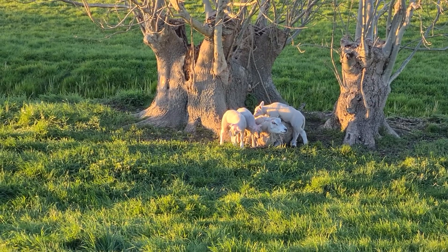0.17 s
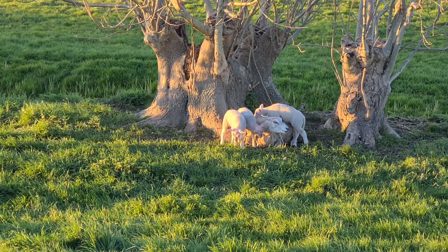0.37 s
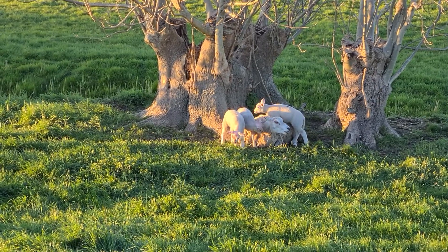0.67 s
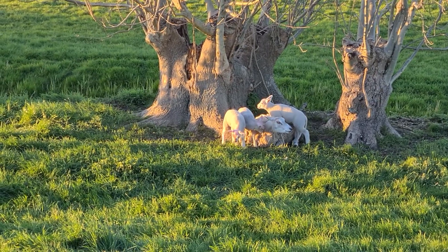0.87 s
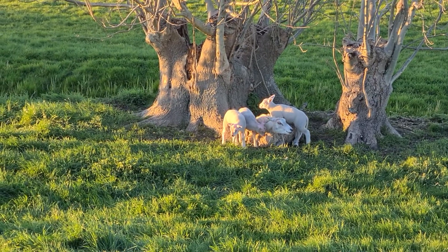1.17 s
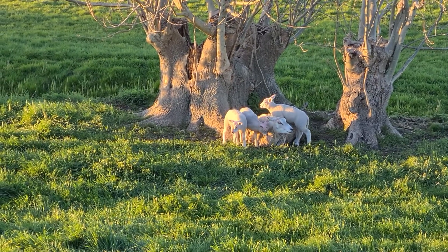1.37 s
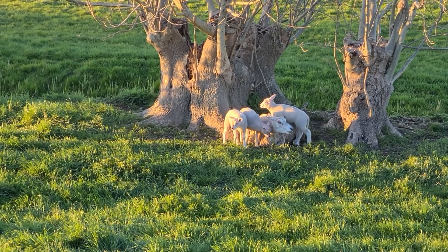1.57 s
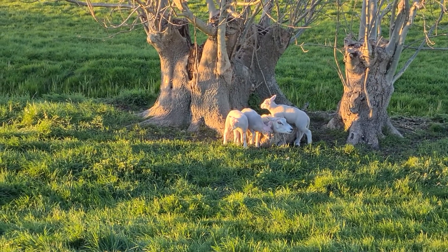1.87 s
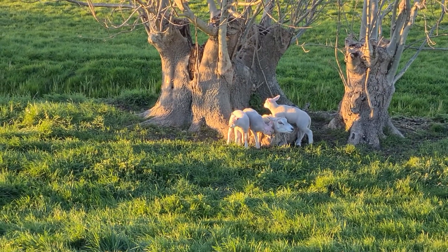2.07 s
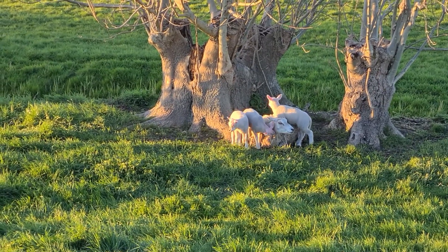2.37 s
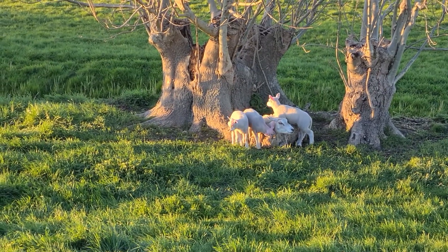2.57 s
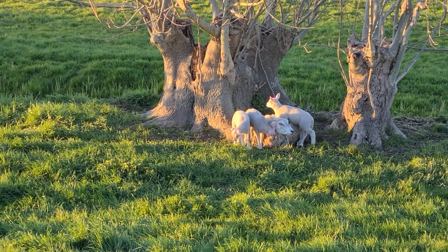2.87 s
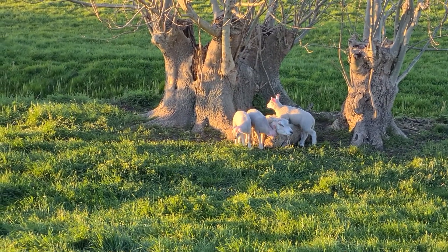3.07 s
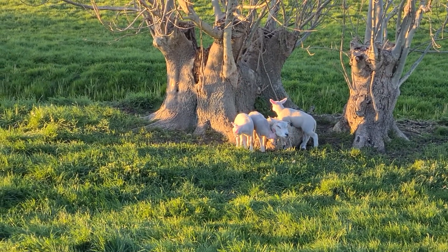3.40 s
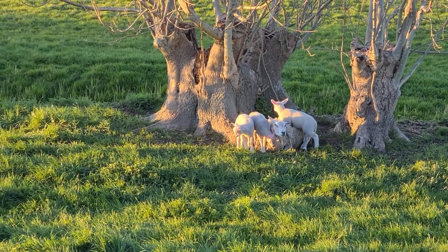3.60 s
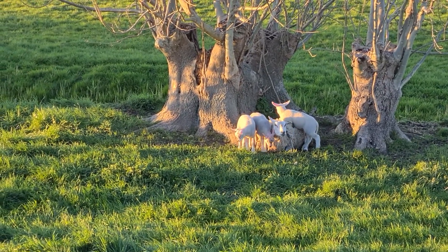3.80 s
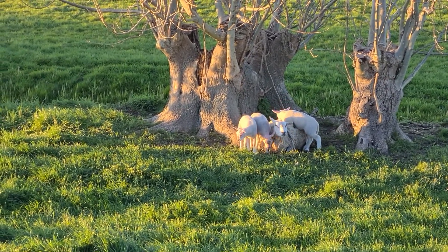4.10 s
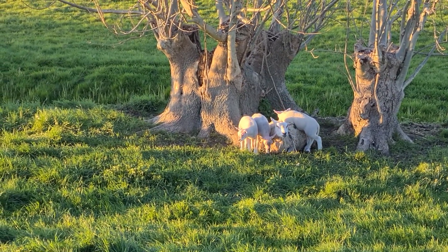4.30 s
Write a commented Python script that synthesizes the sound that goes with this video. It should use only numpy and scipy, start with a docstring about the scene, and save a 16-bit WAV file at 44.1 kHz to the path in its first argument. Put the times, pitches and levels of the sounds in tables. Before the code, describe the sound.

Uneven gusts of wind buffet a microphone in an open meadow, rumbling, fluttering and thumping, with faint bird chips and distant roar behind.

```python
"""Gusts buffet the two microphone ports of a phone held in an open meadow.
Shaped noise rides on a light breeze: large eddies rumble, small ones flutter, single ones thump as short pulses.
Some gusts rasp, nearly all on the left port, and one of them starts with a knock.
Behind the wind lie faint gliding bird chips, tiny crackling ticks, a far roar as of a road,
a throbbing hum within that roar, and a thin hiss."""
import sys
import numpy as np
from scipy import signal
from scipy.fft import rfft, irfft
from scipy.io import wavfile
from scipy.ndimage import uniform_filter1d

SR = 44100
rng = np.random.default_rng(int(sys.argv[2]) if len(sys.argv) > 2 else 0)


def generate_wav(signal):
    """Clip the signal to [-1, 1] and save it as 16-bit WAV at the path in sys.argv[1]."""
    frames = np.transpose(np.atleast_2d(signal))
    scaled = np.clip(frames, -1, 1) * 32767
    pcm = np.round(scaled).astype(np.int16)
    wavfile.write(sys.argv[1], SR, pcm)


N = 196156
T = np.arange(N) / SR  # time [s]
BINS = np.arange(N // 2 + 1) * SR / N  # spectrum frequencies [Hz]

# Colour of the large eddies: (frequency [Hz], density [dB per Hz])
RUMBLE_COLOUR = [(12, -15.5), (25, -13), (45, -3.5), (66, 7), (85, 2), (115, -7.5), (160, -21),
                 (300, -26.5), (700, -94.5)]
# Colour of the small eddies: (frequency [Hz], density [dB per Hz])
FLUTTER_COLOUR = [(70, -17), (120, 3), (160, -1), (200, -4), (235, -10.5), (350, -21.5), (550, -34.5),
                  (1200, -56), (3000, -81)]


def undb(db):
    """Decibels to gain."""
    return 10 ** (np.asarray(db) / 20)


def curve(rows):
    """Rows of (time [s], value) joined by straight lines."""
    return np.interp(T, *np.transpose(rows))


def unit(x):
    """Scale to a standard deviation of 1."""
    return x / x.std()


def noise(points):
    """Gaussian noise with its spectrum shaped along log frequency, at unit level."""
    hz, db = np.transpose(points)
    colour_db = np.interp(np.log(BINS + 1), np.log(hz), db)
    white = rfft(rng.standard_normal(N))
    return unit(irfft(white * undb(colour_db), N))


def pair(mid, side):
    """Left and right from mid and side."""
    return np.array([mid + side, mid - side])


def pan(lean_db):
    """Left and right gains that differ by lean_db; positive leans left."""
    return undb(np.array([[.5], [-.5]]) * lean_db)


def left_mostly(x, right_db):
    """Full level on the left port, right_db on the right."""
    return np.array([[1], [undb(right_db)]]) * x


def walk(rate_hz):
    """Random levels, rate_hz new ones a second, joined by straight slopes; spread 1."""
    hold = max(int(SR / rate_hz), 1)
    steps = np.repeat(rng.standard_normal(N // hold + 1), hold)
    return unit(uniform_filter1d(steps, hold)[:N])


def swell(s, half_s):
    """A bell-shaped rise and fall around time s, down to 1/e at half_s to either side."""
    return np.exp(-((T - s) / half_s) ** 2)


def gusting(rows):
    """Joint strength of gusts (time [s], half length [s], level [dB]); their powers add."""
    return np.sqrt(sum((undb(db) * swell(s, half_s)) ** 2 for s, half_s, db in rows))


def flow(points, even_s):
    """Turbulent pressure of even strength over spans of even_s, ready to be driven by the gusts."""
    x = noise(points)
    power = np.abs(signal.hilbert(x)) ** 2 / 2
    local_power = uniform_filter1d(power, max(int(even_s * SR), 1))
    return x / np.sqrt(local_power + 1e-9)


def at_ports(points, even_s, own_db):
    """Wide eddies press on both ports alike; narrow ones meet each port on its own."""
    # How much the ports differ, before own_db: (time [s], side minus mid [dB])
    port_spread = [(0, -16), (.2, 9), (.47, -7.5), (.72, 5), (.85, -7.5), (1.0, -5.5), (1.35, -8),
                   (1.85, -1), (2.0, -8.5), (2.3, -2.5), (2.55, -8), (2.7, -19.5), (3.35, -24), (3.6, -11),
                   (4.25, -17.5), (4.37, -4)]
    alike = flow(points, even_s)
    opposed = undb(curve(port_spread) + own_db) * flow(points, even_s)
    return pair(alike, opposed)


def wind(rumble_db=1.26, flutter_db=-1.5, lean_db=0.65):
    """Gusts ride on the breeze: large eddies rumble, small ones flutter on top in quick bursts."""
    # Head-on gusts, before trims: (time [s], half length [s], rumble level [dB], flutter level [dB])
    gust_rows = np.array([(0.077, 0.022, -36, -46), (0.444, 0.065, -28, -37), (0.544, 0.067, -35, -35),
                          (0.672, 0.03, -26.5, -47.5), (0.75, 0.055, -36.5, -41.5),
                          (1.035, 0.086, -26.5, -29), (1.321, 0.062, -29.5, -53),
                          (1.428, 0.018, -25.5, -35), (1.845, 0.051, -29.5, -38),
                          (1.944, 0.015, -32.5, -26), (2.003, 0.015, -28, -47),
                          (2.208, 0.026, -25.5, -29.5), (2.316, 0.028, -41, -29.5),
                          (2.432, 0.021, -37, -34), (2.57, 0.075, -27, -38.5), (2.758, 0.1, -27, -40),
                          (2.913, 0.068, -28, -44), (3.169, 0.022, -28, -44.5), (3.51, 0.021, -33, -38.5),
                          (4.056, 0.047, -29, -44.5), (4.158, 0.052, -25, -36), (4.319, 0.026, -29, -45)])
    # The breeze between the gusts, before unrest and trims: (time [s], level [dB])
    breeze_level = [(0, -28), (.22, -38), (.75, -36), (1.2, -38), (1.9, -35), (2.4, -36), (3.0, -35.5),
                    (3.35, -34.5), (3.7, -36.5), (4.45, -34.5)]
    unrest_db, unrest_hz = 3.5, 20  # restlessness of the breeze
    burst_db, burst_hz = 3.0, 45  # bursts of the flutter
    breeze_flutter_db = -13.5  # flutter against rumble in the breeze, before trims

    breeze = undb(curve(breeze_level) + unrest_db * walk(unrest_hz))
    large = np.hypot(gusting(gust_rows[:, [0, 1, 2]]), breeze)
    small = np.hypot(gusting(gust_rows[:, [0, 1, 3]]), breeze * undb(breeze_flutter_db))
    rumble = at_ports(RUMBLE_COLOUR, even_s=.05, own_db=-0.1) * large * undb(rumble_db)
    bursts = undb(flutter_db + burst_db * walk(burst_hz))
    flutter = at_ports(FLUTTER_COLOUR, even_s=.032, own_db=0.4) * small * bursts
    return (rumble + flutter) * pan(lean_db)


def eddies(lean_db=2.5):
    """A vortex crossing the ports is a brief suction with an overshoot on either side."""
    # Single eddies: (time [s], peak before the lean [dB], pitch [Hz], half length [s])
    eddy_rows = [(1.099, -18.5, 118.5, 0.0037), (2.321, -20, 195, 0.0071), (2.761, -24.5, 170, 0.007),
                 (2.786, -12.5, 124, 0.002), (4.193, -17, 112, 0.0021)]
    pressure = np.zeros(N)
    for s, db, hz, half_s in eddy_rows:
        pressure -= undb(db) * swell(s, half_s) * np.cos(2 * np.pi * hz * (T - s))
    return pressure * pan(lean_db)


def rasps(rumble_db=-1.0, flutter_db=-15, rough_db=2.5, rough_hz=160, right_db=-20):
    """Flow that breaks on the rim of the left port buffets it and tears into fine, rough turbulence."""
    # Gusts on the left port: (time [s], half length [s], buffet level before trims [dB],
    # rasp level before roughness [dB])
    side_gusts = [(1.493, 0.024, -19.5, -39), (1.602, 0.043, -26, -42.5), (1.757, 0.086, -23.5, -43.5),
                  (2.083, 0.023, -29, -41), (2.331, 0.018, -31, -43), (2.527, 0.014, -17.5, -44.5),
                  (3.046, 0.018, -23, -39.5), (3.64, 0.021, -19, -40), (3.733, 0.022, -25, -41),
                  (3.87, 0.026, -17.5, -39.5), (3.947, 0.034, -20.5, -42)]
    # Colour of the torn flow: (frequency [Hz], density [dB per Hz])
    rasp_colour = [(120, -0.5), (250, 12.5), (420, 11.5), (800, 1), (1200, -8.5), (1800, -20), (2400, -49),
                   (4000, -77.5)]
    large = gusting((s, half_s, db) for s, half_s, db, _ in side_gusts)
    fine = gusting((s, half_s, db) for s, half_s, _, db in side_gusts)
    rumble = undb(rumble_db) * flow(RUMBLE_COLOUR, even_s=0.056)
    flutter = undb(flutter_db) * noise(FLUTTER_COLOUR)
    buffet = large * (rumble + flutter)
    rasp = fine * noise(rasp_colour) * undb(rough_db * walk(rough_hz))
    return left_mostly(buffet + rasp, right_db)


def knock(right_db=-15):
    """The front of a gust slaps the left port: a very short, damped pulse."""
    s, peak_db, hz, half_s = 3.847, -23.5, 956, 0.00065
    slap = undb(peak_db) * swell(s, half_s) * np.cos(2 * np.pi * hz * (T - s))
    return left_mostly(slap, right_db)


def birds(gain_db=1, lean_db=5, scatter_db=-9, scatter_s=0.061):
    """Short, scratchy glides that turn back near their end; trees scatter them, the left port hears them late."""
    # Bird notes: (start [s], length [s], start pitch [Hz], pitch at the turn [Hz], peak before gain and lean [dB])
    chips = [(-.004, 0.017, 3700, 4270, -58), (0.115, 0.026, 5600, 5350, -74),
             (0.137, 0.016, 3040, 3940, -57), (0.163, 0.026, 4000, 5520, -62.5),
             (0.166, .027, 2900, 4340, -61.5), (0.299, .026, 3970, 4530, -74),
             (0.307, 0.015, 3000, 3230, -68.5), (0.401, 0.029, 4000, 4410, -66),
             (0.485, .019, 4380, 4000, -65.5), (0.488, .018, 5210, 5550, -72.5),
             (0.588, 0.038, 2730, 3280, -70.5), (0.594, 0.018, 3270, 4380, -66),
             (0.812, 0.015, 3310, 3700, -69), (.926, 0.025, 3680, 4100, -69), (.935, .017, 3090, 2960, -72),
             (0.983, 0.014, 2800, 3120, -68.5), (1.275, 0.045, 2970, 2480, -68),
             (1.313, .029, 2720, 2420, -70), (1.496, 0.051, 2085, 2120, -66.5),
             (3.014, 0.07, 3150, 2590, -78)]
    tremble, tremble_hz = 0.023, 900  # pitch roughness as a fraction, and its rate
    turn = 0.82  # fraction of the note at which the glide turns back
    lag_s = 0.000408  # delay of the direct song at the left port

    song, waver = np.zeros(N), 1 + tremble * walk(tremble_hz)
    for s, length_s, start_hz, turn_hz, db in chips:
        progress = np.clip((T - s) / length_s, 0, 1)
        hz = turn_hz + (start_hz - turn_hz) * (1 - progress / turn) ** 2
        phase = 2 * np.pi * np.cumsum(hz * waver) / SR
        song += undb(db + gain_db) * np.sin(np.pi * progress) * np.sin(phase)
    direct = np.array([np.interp(T - lag_s, T, song), song]) * pan(lean_db)

    # The trees: half a second of fading noise, separate for each port
    trees = rng.standard_normal((2, SR // 2)) * np.exp(-T[:SR // 2] / scatter_s)
    trees /= np.linalg.norm(trees[0])
    echo = signal.fftconvolve(song[None], trees, axes=1)[:, :N]
    return direct + undb(scatter_db) * echo


def ticks(gain_db=-6, crackle_db=3, crackle_hz=600, decay_s=.011):
    """Small contacts: each a short, dry crackle that starts at once and dies away."""
    # Tiny ticks: (time [s], starting level before gain and crackle [dB])
    tick_rows = [(.803, -62), (1.6731, -61.5), (1.8357, -61), (2.466, -60.5), (2.667, -67), (3.27, -69.5),
                 (3.383, -72.5), (3.5235, -67.5), (4.125, -65)]
    # Colour of a tick: (frequency [Hz], density [dB per Hz])
    tick_colour = [(1500, -25.5), (2800, 2), (3800, 3.5), (5200, -7.5), (7000, -2.5), (8000, -21.5),
                   (14000, -29.5)]
    envelope = np.zeros(N)
    for s, db in tick_rows:
        envelope += undb(db + gain_db) * (T >= s) * np.exp(-np.abs(T - s) / decay_s)
    grains = np.array([noise(tick_colour), noise(tick_colour)])
    return envelope * undb(crackle_db * walk(crackle_hz)) * grains


def far_roar():
    """Distant sound that has lost its treble; it comes from many sides, so the ports agree only partly."""
    # Colour of the roar, before body and top are levelled: (frequency [Hz], density [dB per Hz])
    roar_colour = [(100, -21), (250, -0.5), (400, 2), (500, -5.5), (590, -1), (800, -3), (980, -2.5),
                   (1150, -1.5), (1400, -7.5), (1620, -18), (1850, -13.5), (2100, -24), (2400, -36.5),
                   (4000, -58.5)]
    # The roar at the two ports: (frequency [Hz], likeness [0-1], lead of the left port [rad])
    roar_ports = [(324, 0.95, -0.5), (500, 0.98, 1), (675, 0.7, -1), (960, 1, -1.9), (1060, 0.3, -2.5),
                  (1350, 0.6, -2.5), (1710, 0.2, -5.5), (1850, 0.4, -9), (2000, 0.5, -10),
                  (2270, 0.9, -11.5), (3000, 0, -11)]
    # Below the split, before waver and lean: (time [s], level [dB])
    body_level = [(0, -47.5), (.3, -50.5), (.95, -51), (1.6, -49), (2.4, -51), (2.7, -49.5), (3.45, -50),
                  (3.9, -47.5), (4.45, -52.5)]
    # Above the split, before waver and lean: (time [s], level [dB])
    top_level = [(0, -53), (.9, -54), (2.15, -52), (2.52, -53), (2.66, -51), (3.1, -52.5), (3.45, -52.5),
                 (4.15, -53.5), (4.45, -55.5)]
    split_hz = 831  # body and top waver separately
    body_waver_db, body_lean_db = 1.7, -1.9
    top_waver_db, top_lean_db = 1.04, -0.1

    hz, likeness, lead = np.transpose(roar_ports)
    shared = np.clip(np.interp(BINS, hz, likeness), 0, 1)
    right = rfft(noise(roar_colour))
    common = shared * right * np.exp(1j * np.interp(BINS, hz, lead))
    left = common + np.sqrt(1 - shared ** 2) * rfft(noise(roar_colour))
    both = np.array([left, right])
    body = irfft(both / (1 + (BINS / split_hz) ** 20), N)
    top = irfft(both, N) - body
    body = unit(body) * undb(curve(body_level) + body_waver_db * walk(8)) * pan(body_lean_db)
    top = unit(top) * undb(curve(top_level) + top_waver_db * walk(8.1)) * pan(top_lean_db)
    return body + top


def far_hum(gain_db=-2.5, throb_db=3.0, throb_hz=22, side_db=-5):
    """A narrow, almost tonal band in the far roar that throbs as the wind carries it."""
    # Colour of the hum: (frequency [Hz], density [dB per Hz])
    hum_colour = [(450, -34), (620, -15.5), (690, -3), (760, -1), (820, -6.5), (900, -15.5), (1200, -63.5)]
    # The hum swells and fades, before gain and throb: (time [s], level [dB])
    hum_level = [(0, -55.5), (.27, -48), (.46, -56), (.87, -51.5), (1.25, -55), (1.38, -51.5), (2.0, -54),
                 (2.35, -53.5), (3.6, -52), (3.78, -67), (3.95, -57), (4.45, -75)]
    band = pair(noise(hum_colour), undb(side_db) * noise(hum_colour))
    return band * undb(curve(hum_level) + gain_db + throb_db * walk(throb_hz))


def hiss(level_db=-75.5, lean_db=2.0):
    """Thin, smooth floor of grass and microphone above the roar, unrelated at the two ports."""
    # Colour of the hiss: (frequency [Hz], density [dB per Hz])
    hiss_colour = [(1500, 1.5), (3000, 1.5), (4200, -3), (5200, -7.5), (6500, -6.5), (7300, -3),
                   (8200, -19.5), (9400, -24.5), (10500, -11), (15500, -12)]
    return undb(level_db) * np.array([noise(hiss_colour), noise(hiss_colour)]) * pan(lean_db)


def scene():
    """Wind close by at the ports, everything else faint behind it."""
    close = wind() + eddies() + rasps() + knock()
    behind = birds() + ticks() + far_roar() + far_hum() + hiss()
    return close + behind


def record(dry):
    """The phone cuts the top: a steep elliptic low-pass at 15.7 kHz."""
    low_pass = signal.ellip(8, .2, 70, 15700, fs=SR, output="sos")  # order, ripple [dB], stop [dB], edge [Hz]
    return signal.sosfilt(low_pass, dry)


dry = scene()
out = record(dry)
generate_wav(out)
```